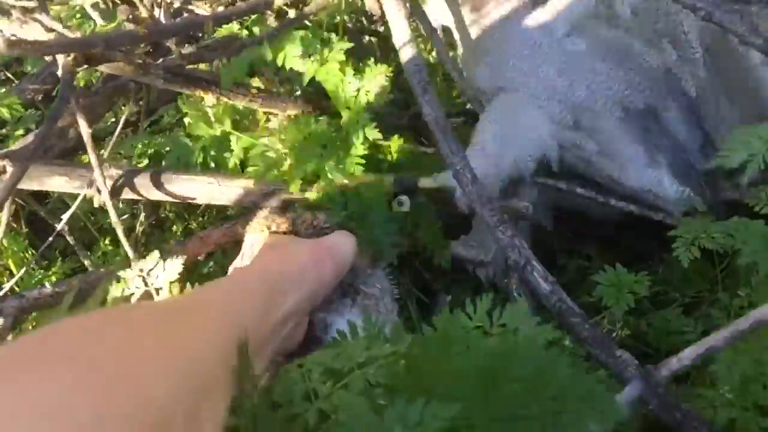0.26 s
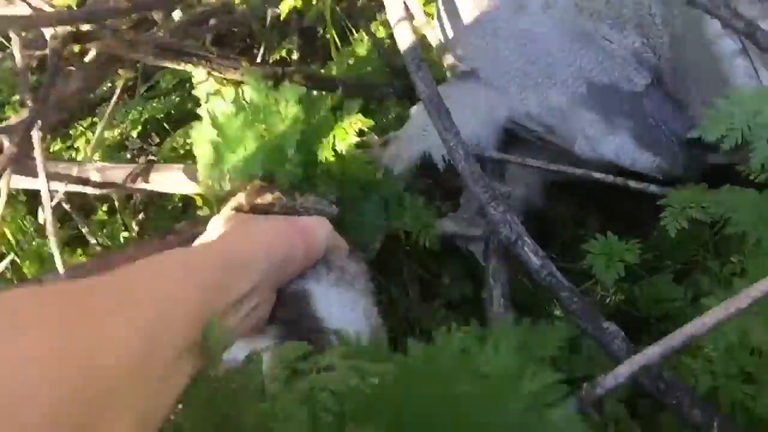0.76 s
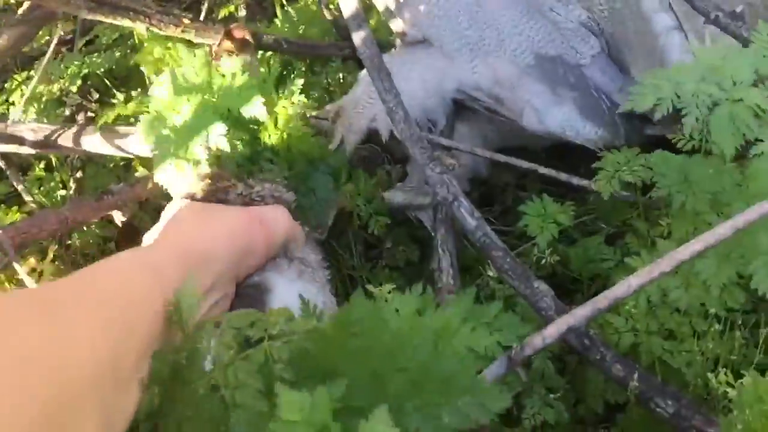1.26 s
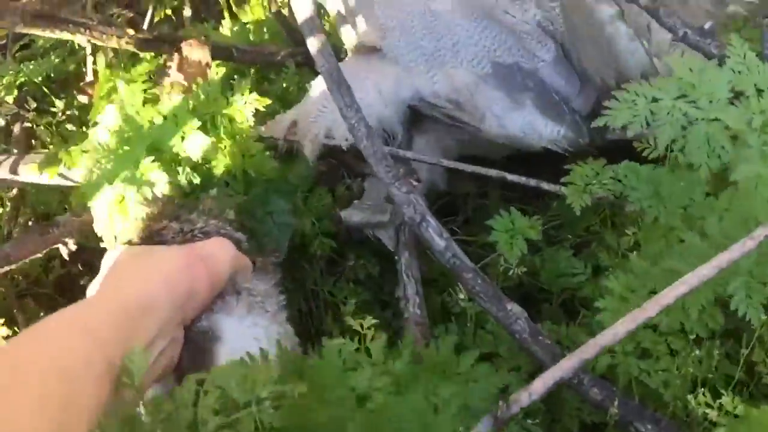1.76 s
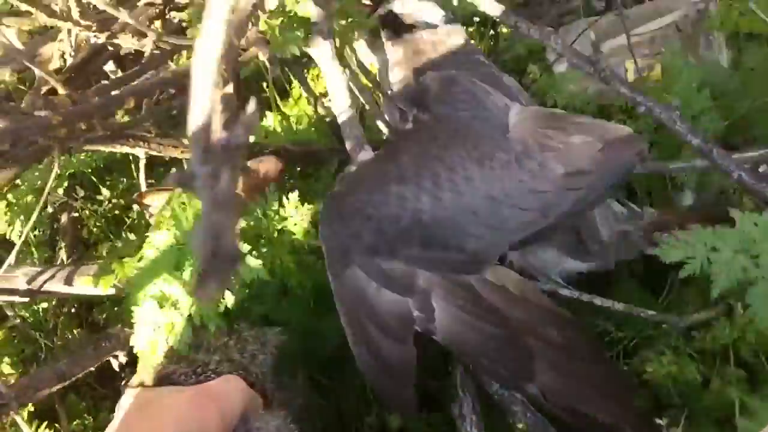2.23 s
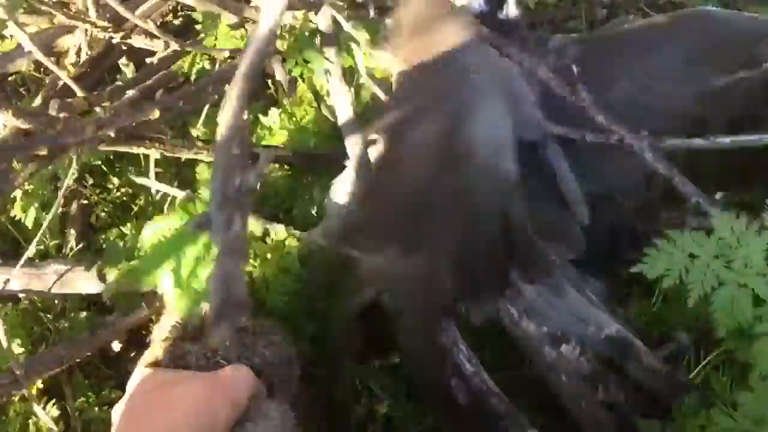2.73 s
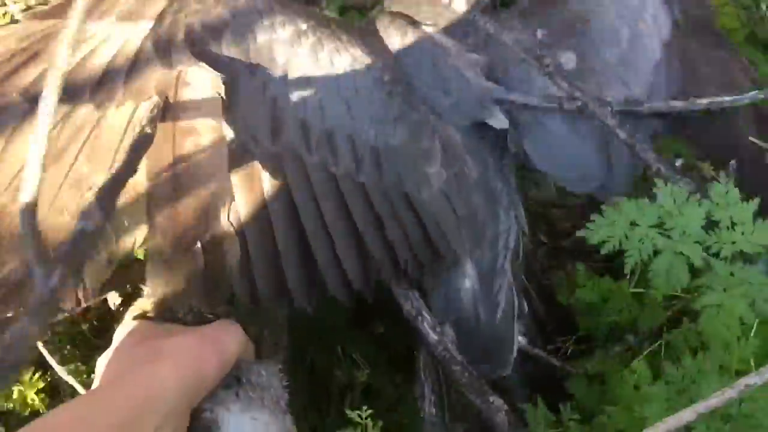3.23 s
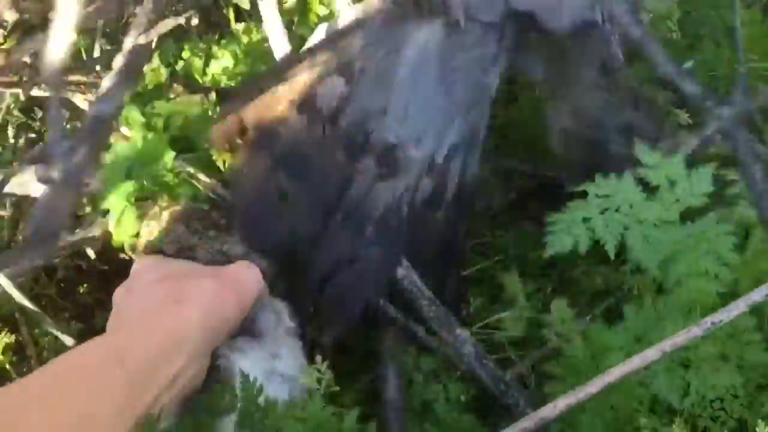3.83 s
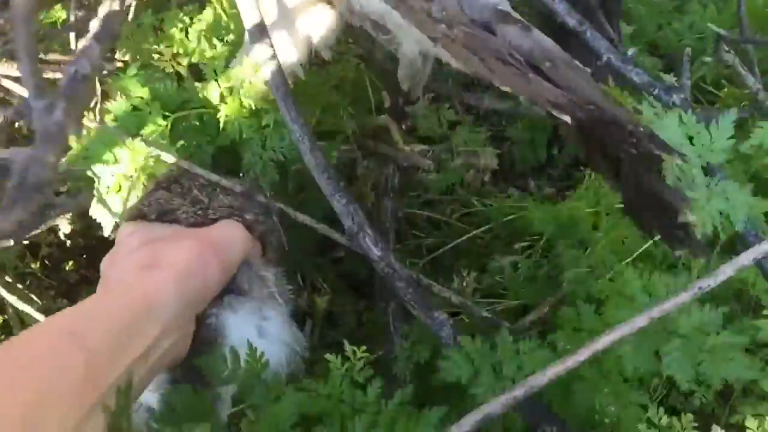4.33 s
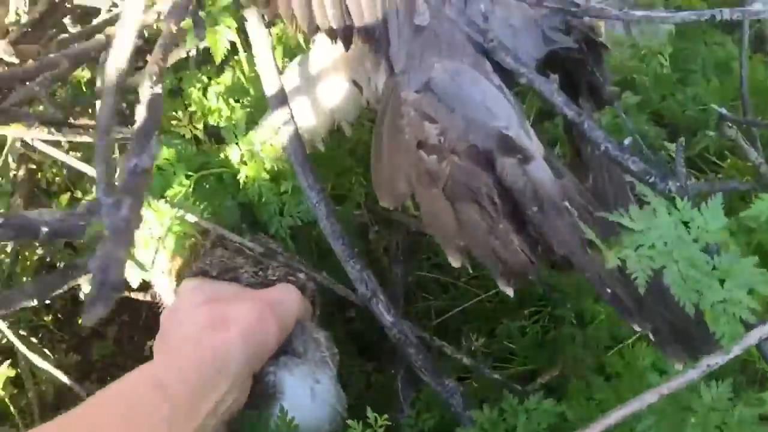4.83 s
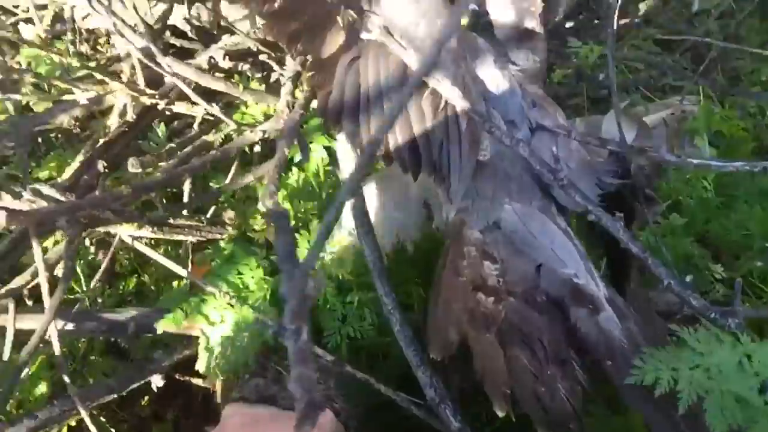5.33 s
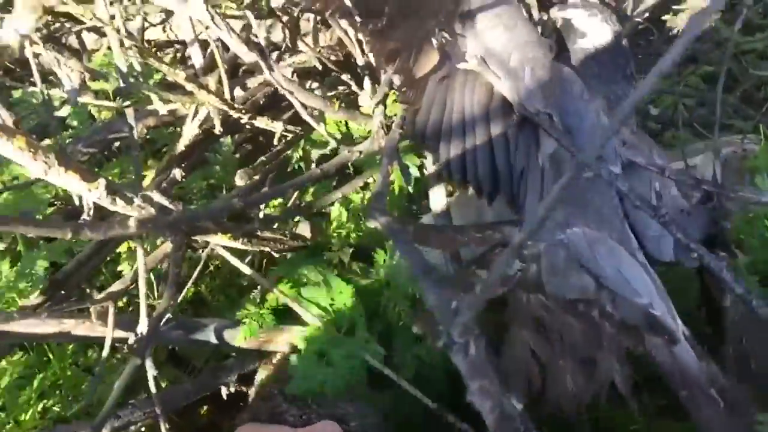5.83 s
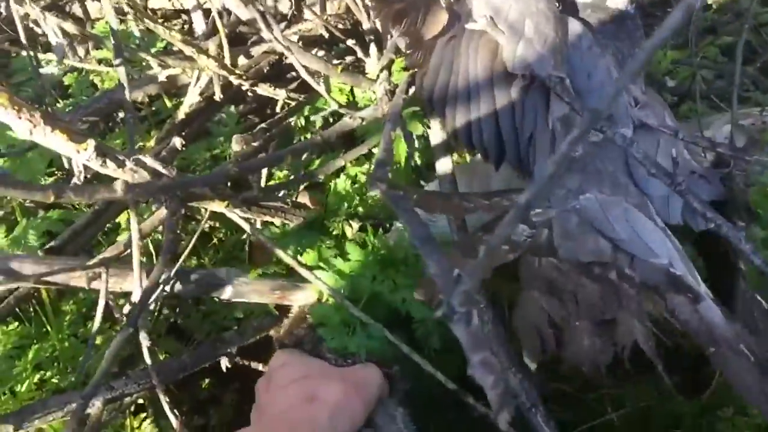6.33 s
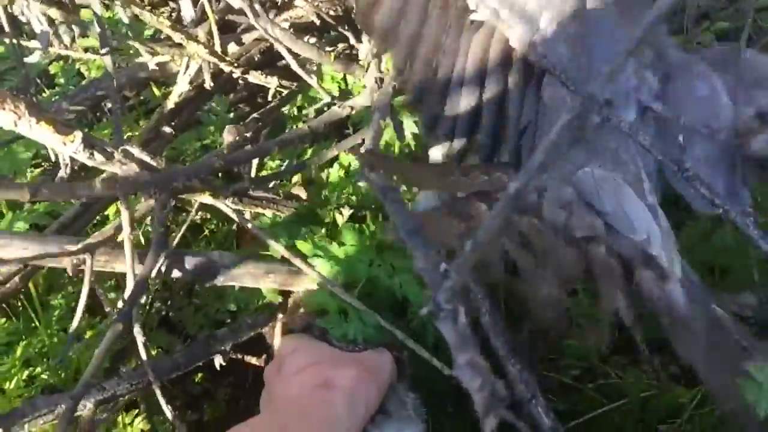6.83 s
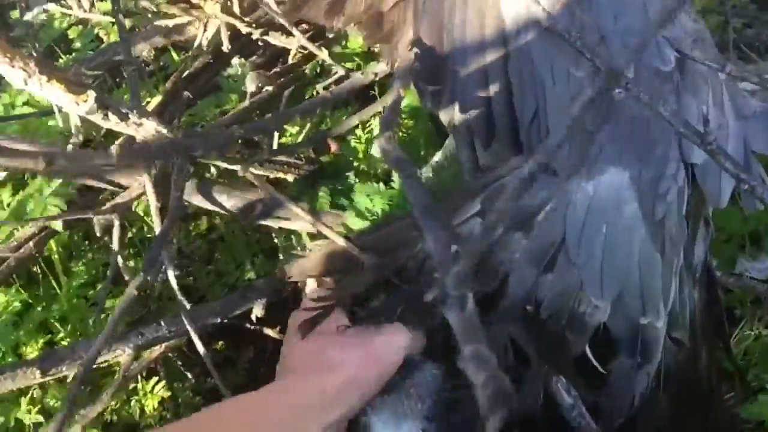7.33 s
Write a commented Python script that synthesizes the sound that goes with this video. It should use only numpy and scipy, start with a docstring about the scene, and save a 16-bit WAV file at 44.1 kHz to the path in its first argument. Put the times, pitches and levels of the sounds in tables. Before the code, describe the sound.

Thin gliding whistles and a small twig crack open an outdoor scene, and at once an animal begins screaming, high and harsh, about every two thirds of a second. Wings swish and crackle through leaves, strongest between two and four seconds, with sharp snapping twigs. Later the screams dominate over light rustling, until one more hard wing brush near seven seconds. The handheld microphone is close and catches dull bumps; the space is nearly dry.

```python
"""Outdoors in dry brush: an uneven rumble and a faint hush, filtered noise, lie under stirring leaves.
Thin gliding whistles and snapping twigs, short noise cracks, come in at once. Then a small animal, held down,
screams twelve times: pulsing folds rise as a clear tone, break into a rasp, then lock into a hoarse, fluttering tone.
Soft bumps, sinking sines, reach the microphone, while a large bird beats its wings among the branches:
swelling sweeps of noise and crackle. Ground and thicket add close scatter and a faint tail."""
import sys
import numpy as np
from scipy import signal
from scipy.fft import rfft, irfft
from scipy.io import wavfile
from scipy.ndimage import uniform_filter1d

SR = 44100
rng = np.random.default_rng(int(sys.argv[2]) if len(sys.argv) > 2 else 0)


def to_wav(sig):
    """Store sig (one row per channel, or 1-D mono) as 16-bit WAV at the path in sys.argv[1].

    Samples outside -1..1 are clipped; the rate is SR.
    """
    pcm = np.clip(np.atleast_2d(sig), -1, 1) * 32767
    pcm = np.round(pcm).astype(np.int16)
    wavfile.write(sys.argv[1], SR, pcm.T)  # frames by channels


N = 333837
TIME = np.arange(N) / SR


def amp(db):
    """Amplitude of a level in dB."""
    return 10 ** (np.asarray(db) / 20)


def unit(x):
    """Scale to an RMS of 1."""
    return x / np.sqrt(np.mean(x ** 2) + 1e-20)


def add(mix, s, sound):
    """Lay a sound into the mix from time s, cut at the end."""
    part = mix[max(round(s * SR), 0):][:len(sound)]
    part += sound[:len(part)]


def drift(t, hz):
    """Random curve of RMS 1, in straight lines between hz new values a second."""
    return unit(np.interp(t * hz, np.arange(8192), rng.standard_normal(8192)))


def colour(x, points, size=2048):
    """Causal (minimum-phase) filter with the given (frequency [Hz], gain [dB]) outline."""
    hz, db = np.transpose(points)
    bins_hz = np.fft.rfftfreq(size, 1 / SR)
    log_gain = np.log(amp(np.interp(np.log(bins_hz + 1), np.log(hz), db)))
    # folding the cepstrum onto positive times makes the filter causal
    cepstrum = irfft(log_gain)
    cepstrum[1:size // 2] *= 2
    cepstrum[size // 2 + 1:] = 0
    response = irfft(np.exp(rfft(cepstrum)))
    return signal.oaconvolve(x, response)[:len(x)]


def pulses(places, sizes, length):
    """Band-limited clicks at exact places between samples."""
    at = np.floor(places).astype(int)[:, None] + np.arange(-7, 9)
    offset = at - places[:, None]
    shape = np.sinc(offset) * np.cos(np.pi * offset / 16) ** 2
    return np.bincount(np.clip(at, 0, length - 1).ravel(), (shape * sizes[:, None]).ravel(), length)


def step(t, s, width):
    """Soft switch from 0 to 1, halfway at time s."""
    return .5 + .5 * np.tanh((t - s) / width)


# spectral outline of the outdoor hush: (frequency [Hz], relative level [dB])
HUSH_OUTLINE = [(25, -21.5), (80, -6.5), (250, -22), (400, -21), (600, -14.5), (1000, -25), (1800, -18),
                (2400, -27), (3200, -24), (4800, -50), (8000, -56), (15000, -63.5)]
# spectral outline of the rumble: (frequency [Hz], relative level [dB])
RUMBLE_OUTLINE = [(25, -38), (60, 3), (120, -3), (250, -18.5), (700, -24.5), (2000, -71.5)]


def air(hush_db=-52, rumble_db=-51):
    """Faint outdoor hush and an uneven rumble on the microphone, both filtered noise."""
    hush = unit(colour(rng.standard_normal(N), HUSH_OUTLINE, size=8192))
    hush *= amp(hush_db + drift(TIME, 20))
    rumble = unit(colour(rng.standard_normal(N), RUMBLE_OUTLINE, size=8192))
    settling_db = np.interp(TIME, [3.5, 4.5], [1.5, -4])  # the rumble is weaker in the second half
    return hush + rumble * amp(rumble_db + 3.8 * drift(TIME, 11) + settling_db)


def sweep(s, rise, fall, db, fade_db=-21.5):
    """Strength of one wing brush: it swells to its peak and dies away, losing fade_db over its rise or fall."""
    return amp(db + fade_db * np.maximum((s - TIME) / rise, (TIME - s) / fall))


# spectral outline of rustling leaves: (frequency [Hz], gain [dB])
LEAF_OUTLINE = [(60, -13.5), (200, -3), (450, -10), (900, -4.5), (1600, -4), (2400, -8.5), (3400, 3),
                (4500, -10), (7000, -20.5), (10000, -30.5), (15000, -35.5)]
# wings and leaves brushing the branches: (loudest time [s], rise [s], fall [s], strength at the peak [dB])
WING_SWEEPS = [(.58, 0.24, 0.58, -40.5), (2.15, 0.055, .35, -34), (2.45, 0.9, 0.49, -35),
               (2.81, 0.083, 0.13, -29.5), (2.924, 0.22, .06, -20), (3.02, 0.12, 0.17, -33),
               (3.37, 0.17, 0.96, -31), (3.615, 0.063, 0.032, -26), (3.881, 0.047, 0.052, -18),
               (4.05, 0.6, 0.48, -39.5), (5.3, 0.56, 0.42, -44), (6.933, .03, .045, -18.5),
               (7.13, 0.08, 0.28, -43)]
STIR_DB = -58.5  # the leaves never lie quite still


def rustle(grains_per_s=900, grain_db=4.0, swish=0.3, crisp_db=6):
    """Feathers swish over leaves, with clumps of tiny crackles; hard sweeps are crisper."""
    struck = rng.random(N) < grains_per_s / SR
    grain_sizes = amp(grain_db * np.minimum(rng.exponential(1, N), 4))
    grains = struck * rng.choice([-1, 1], N) * grain_sizes
    sound = unit(colour(grains + swish * rng.standard_normal(N), LEAF_OUTLINE))
    clumps_db = 2.5 * drift(TIME, 110)
    strength = np.sqrt(amp(STIR_DB) ** 2 + sum(sweep(*row) ** 2 for row in WING_SWEEPS))
    treble = signal.sosfiltfilt(signal.butter(2, 9000, "high", fs=SR, output="sos"), sound)
    crispness = amp(crisp_db) * np.sqrt(strength / strength.max())
    return (sound + treble * (crispness - 1)) * strength * amp(clumps_db)


# thin whistles: (start [s], loudest time [s], end [s], first pitch [Hz], middle pitch [Hz], last pitch [Hz],
#   RMS level at the loudest [dB]); a row that ends before it starts is silent
WHISTLE_GLIDES = [(0, 0.057, 0.096, 1607, 1710, 1870, -31), (.08, 0.143, 0.27, 1830, 1646, 1570, -27.5),
                  (.47, 0.617, 0.66, 756, 883, 810, -41.5), (.63, 0.784, 1.07, 784, 877, 834, -32),
                  (.93, 1.01, 1.06, 839, 819, 786, -31.5), (1.036, 1.063, 1.14, 710, 620, 555, -47),
                  (1.42, 1.433, 1.48, 2420, 3440, 3060, -20.5), (3.189, 3.35, 3.4, 816, 905, 907, -39),
                  (4.969, 4.981, 4.99, 1160, 1224, 1340, -24.5),
                  (4.986, 5.018, 5.03, 1650, 1760, 1770, -12), (5.025, 5.084, 5.27, 1810, 1780, 1567, -37),
                  (5.178, 5.21, 5.14, 4700, 5100, 4940, -42.5), (7.129, 7.14, 7.168, 1014, 912, 1030, -30)]
WHISTLE_FADE_DB = -11  # level at both ends, relative to the loudest point


def whistle(start, loudest, end, first_hz, middle_hz, last_hz, db):
    """A second, nearly pure oscillation beside the voice glides along one arc, swelling and fading."""
    t = np.arange(start, end, 1 / SR)
    arc = np.polyfit([0, .5, 1], [first_hz, middle_hz, last_hz], 2)
    hz = np.polyval(arc, (t - start) / (end - start))
    phase = 2 * np.pi * np.cumsum(hz * (1 + 0.019 * drift(t, 250))) / SR
    tone = unit(np.sin(phase) + amp(-15) * np.sin(2 * phase) + amp(-25) * np.sin(3 * phase))
    fade_db = WHISTLE_FADE_DB * np.interp(t, [start, loudest, end], [1, 0, 1])
    level = amp(db + fade_db + 2 * drift(t, 60))
    return start, tone * level * signal.windows.tukey(len(t), .1)


# twigs snapping: (time [s], level, 6 dB under the peak [dB], ring [Hz])
TWIG_SNAPS = [(0.015, -24.5, 3400), (0.517, -27, 3370), (0.576, -27.5, 2570), (0.605, -33, 3400),
              (0.621, -18.5, 3320), (1.952, -27, 1600), (2.037, -18.5, 1000), (2.112, -17.5, 1100),
              (2.159, -11.5, 3150), (2.221, -20, 1200), (2.459, -10.5, 1580), (2.803, -14, 3380),
              (2.918, -13.5, 2400), (3.819, -24, 3360), (3.845, -32, 3630), (3.874, -28, 3390),
              (3.894, -19, 3530), (7.104, -22.5, 3660), (7.133, -26, 3600)]


def snap(s, db, hz):
    """A dry twig cracks, rings for a moment and shakes its leaves: noise with a fast and a slow decay."""
    t = np.arange(0, .06, 1 / SR)
    crack = rng.standard_normal(len(t)) * (np.exp(-t / .0018) + .07 * np.exp(-t / .012))
    wood = colour(crack, [(120, -26), (750, -9), (hz, 0), (4000, -5), (5200, -20), (14000, -38)])
    return s, amp(db + 6) * wood / abs(wood).max()


# the voice cracks for a moment: (time [s], length [s], jump [share of the pitch])
VOICE_CRACKS = [(2.063, 0.03, -0.071), (4.641, 0.011, -.1), (5.283, 0.0164, 0.19), (5.337, 0.073, -0.17),
                (5.982, 0.013, -.1), (7.283, 0.015, -0.13)]
CLIMB = .11  # share by which the pitch climbs during the clear rise
CREST_S, SAG_HZ_PER_S = .1, 450  # from locking to the crest; then the pitch sags as the breath runs out
WANDER, WANDER_PER_S = .006, 35  # the pitch is never quite steady: share of the pitch, changes a second


def scream_pitch(t, start, breaks, locks, rise_hz, lock_hz, crest_hz):
    """The pitch climbs through the rise, leaps during the rasp, crests and sags; now and then it cracks."""
    turning_points = [start, breaks, locks, locks + CREST_S]
    pitches = [rise_hz * (1 - CLIMB / 2), rise_hz * (1 + CLIMB / 2), lock_hz, crest_hz]
    hz = np.interp(t, turning_points, pitches)
    hz -= SAG_HZ_PER_S * np.maximum(t - locks - CREST_S, 0)
    hz *= 1 + WANDER * drift(t, WANDER_PER_S)
    jumps = sum(share * (step(t, s, 0.0029) - step(t, s + length, 0.0047))
                for s, length, share in VOICE_CRACKS)
    return hz * (1 + jumps)


SOFT_START_DB, ATTACK_S = -12.5, 0.03  # each scream starts softly and gathers force


def scream_effort(t, start, end, opening_db, closing_db):
    """Level in dB: a quick attack over a straight line from opening to closing level."""
    line_db = np.interp(t, [start, end], [opening_db, closing_db])
    return line_db + SOFT_START_DB * np.exp(-(t - start) / ATTACK_S)


CATCHES_IN_RISE, CATCHES_HELD = 38, 78  # typical catches of the folds a second
CATCH_S = .0027  # half the length of one catch


def fold_catches(t, broken, locked, strain, strain_rate):
    """The folds catch again and again, at uneven intervals and with uneven force."""
    rate = CATCHES_IN_RISE * (1 - broken) + CATCHES_HELD * (broken - strain) + strain_rate * strain
    rate = rate * np.exp((.36 - .25 * locked) * drift(t, 50))
    from_catch_s = ((np.cumsum(rate) / SR + rng.random()) % 1 - .5) / rate
    catch = np.exp(-(from_catch_s / CATCH_S) ** 2)
    return catch * np.clip(1 + .35 * drift(t, 45), .1, 1.4)  # some are hard, some barely happen


def fold_pulses(t, turns, rough, weakening):
    """One pulse a fold cycle: roughness scatters time and size, weakening shrinks every other pulse."""
    samples = np.arange(len(t))
    cycle = np.arange(1, int(turns[-1]))
    at = np.interp(cycle, turns, samples).astype(int)
    late, strong, wander = rng.standard_normal((3, len(cycle)))
    chaos = np.minimum(rough * np.exp(.3 * drift(t, 60)), 1)[at]
    # a second mode of the folds beats against the first: wandering side tones
    beat = np.cos(2 * np.pi * np.cumsum(.3 + .08 * drift(t, 70)[at]))
    weak = (cycle % 2) * weakening[at]
    slips = chaos * (.04 * late + .14 * beat) + np.cumsum(.027 * chaos * wander)
    force = chaos * (.3 * strong + .55 * beat + .3 * drift(t, 450)[at])
    sizes = (1 - weak) * (1 + .85 * np.tanh(force))
    return pulses(np.interp(cycle + slips, turns, samples), sizes, len(t))


# throat with the mouth half open: (frequency [Hz], gain [dB])
THROAT_HALF_OPEN = [(400, -62.5), (750, -19.5), (1050, -6.5), (1500, -9), (2050, 6.5), (2700, -16.5),
                    (3300, -7), (4300, -16.5), (5400, -13), (6500, -34), (9300, -28), (10700, -51.5),
                    (15000, -49)]
# throat with the mouth wide open: (frequency [Hz], gain [dB])
THROAT_WIDE_OPEN = [(400, -35.5), (750, -22), (1150, -10.5), (1550, -27.5), (2300, -2), (3050, 1),
                    (3750, -0.5), (4400, -16), (4900, -22.5), (5350, -11.5), (6500, -25.5), (9300, -35),
                    (10700, -42), (15000, -63)]
# side resonances of the throat that swell and fade: (frequency [Hz], sharpness Q [-])
SIDE_RESONANCES = [(2250, 7.4), (3750, 2)]
SHIFT_DB, SHIFT_PER_S = 1.8, 30  # their RMS change, changes a second


def throat(t, folds, mouth, rasp, strain, waver_db, pinch_db):
    """Resonances shape the fold pulses as the mouth opens; the result is evened to a steady level."""
    voice = (1 - mouth) * colour(folds, THROAT_HALF_OPEN) + mouth * colour(folds, THROAT_WIDE_OPEN)
    # the rasp rings the main throat resonance, which gives it a coarse grain
    ring = signal.lfilter(*signal.iirpeak(2750, 4.5, fs=SR), voice)
    voice = voice + 1.5 * rasp * ring
    for side_hz, q in SIDE_RESONANCES:
        side = signal.lfilter(*signal.iirpeak(side_hz, q, fs=SR), voice)
        voice = voice + side * (amp(SHIFT_DB * drift(t, SHIFT_PER_S)) - 1)
    # the upper resonances waver, and are pinched under strain
    upper = signal.sosfiltfilt(signal.butter(4, 4500, "high", fs=SR, output="sos"), voice)
    voice = voice + upper * (amp(waver_db * drift(t, 25) + pinch_db * strain + 0.4) - 1)
    return voice / np.sqrt(abs(uniform_filter1d(voice ** 2, size=800)) + 1e-12)


# one row a scream: (start [s], breaks into a rasp [s], locks again [s], strain sets in [s], end [s],
#   opening level before the soft start [dB], closing level [dB], mid-rise pitch [Hz], pitch on locking [Hz],
#   crest pitch [Hz], roughness of the rise [0-1], roughness after locking [0-1], period doubling [0-1],
#   typical catches under strain [1/s])
SCREAM_ROWS = [(.075, .18, .365, .52, .484, -21.5, -21.5, 1095, 1190, 1185, .16, .17, .05, 60),
               (.638, .8, .93, .95, 1.138, -24, -19, 1110, 1440, 1490, .17, .5, .5, 70),
               (1.285, 1.49, 1.585, 1.705, 1.872, -22.5, -14.3, 1050, 1515, 1555, .11, .05, .8, 45),
               (2.02, 2.225, 2.31, 2.44, 2.558, -22, -12.8, 1030, 1530, 1582, .06, .05, .8, 80),
               (2.7, 2.82, 2.94, 2.97, 3.186, -20.5, -17.5, 1060, 1630, 1565, .12, .13, .8, 70),
               (3.326, 3.49, 3.605, 3.64, 3.81, -23.5, -14, 1045, 1470, 1545, .11, .07, .8, 48),
               (3.97, 4.12, 4.245, 4.28, 4.453, -22.5, -15.7, 1155, 1485, 1547, .1, .07, .8, 40),
               (4.596, 4.762, 4.86, 4.99, 5.108, -22.3, -13, 1020, 1410, 1465, .12, .06, .8, 80),
               (5.266, 5.44, 5.545, 5.62, 5.788, -24, -11.5, 1060, 1400, 1540, .1, .14, .8, 58),
               (5.924, 6.06, 6.19, 6.3, 6.447, -21, -13.7, 1075, 1570, 1535, .11, .07, .8, 80),
               (6.588, 6.78, 6.88, 6.98, 7.088, -21.3, -14.7, 1075, 1510, 1680, .06, .24, .7, 85),
               (7.228, 7.38, 7.52, 7.6, 7.6, -22.3, -16, 1065, 1380, 1520, .11, .2, .7, 80)]
DIP_LEAST, DIP_PER_ROUGH = .035, .5  # a rougher rise dips further in pitch


def scream(start, breaks, locks, strains, end, opening_db, closing_db, rise_hz, lock_hz, crest_hz,
           rough_rise, rough_held, doubling, strain_rate, leak_db=-45, waver_db=2.5, pinch_db=-6):
    """Vocal folds pulse evenly, then chaotically, then strong-weak, through a throat that opens."""
    t = np.arange(start, end, 1 / SR)
    broken, locked, strain = step(t, breaks, .005), step(t, locks, .005), step(t, strains, .01)
    rasp = broken - locked
    rise = 1 - broken
    catch = fold_catches(t, broken, locked, strain, strain_rate)

    # each catch dips the pitch
    dips = DIP_LEAST + DIP_PER_ROUGH * rough_rise
    depth = 1.05 * dips * rise + .032 * broken + 1.4 / strain_rate * strain
    depth = depth * np.exp(.22 * drift(t, 40))
    wobble = .003 + .12 * rough_rise * rise + .045 * rasp + .02 * rough_held * locked
    hz = scream_pitch(t, start, breaks, locks, rise_hz, lock_hz, crest_hz)
    hz *= 1 - depth * (catch - .25) + wobble * drift(t, 170)
    # slack folds at both ends
    hz *= 1 - 0.27 * np.exp(-(t - start) / .014) - 0.42 * doubling * np.exp((t - end) / 0.00704)
    turns = np.cumsum(hz) / SR

    rough = rough_rise * rise * (.9 + 2.2 * catch) + (.3 + .65 * doubling) * rasp
    rough += .8 * rough_held * locked + strain * (.02 + .12 * catch)
    weakening = doubling * (.25 * broken + .75 * locked)
    folds = fold_pulses(t, turns, rough, weakening)
    folds += amp(leak_db) * rng.standard_normal(len(t)) * np.cos(np.pi * turns) ** 2  # air leaks each cycle
    mouth = step(t, breaks, 0.21) * np.clip(0.29 + doubling, 0, 1)
    voice = throat(t, folds, mouth, rasp, strain, waver_db, pinch_db)

    flutter_db = (.6 + 2.6 * strain) * (catch - .3) + .8 * drift(t, 110)
    swell = (1 - np.exp(-(t - start) / .008)) ** 2 * np.tanh((end - t) / .009) ** 2
    # the rasp loses power; the locked tone rings out until the strain chokes it
    register_db = -1.2 * rasp + 0.14 * locked * (1 - strain) + 0.14
    effort_db = scream_effort(t, start, end, opening_db, closing_db)
    return start, voice * swell * amp(effort_db + flutter_db + register_db)


# soft bumps: (time [s], peak level [dB], base pitch, which sinks from 1.455 to 0.795 of it [Hz])
SOFT_BUMPS = [(0.248, -27.5, 57), (0.43, -29, 93), (1.79, -18, 95), (2.305, -28.5, 89.5), (2.918, -27, 171),
              (3.398, -25.5, 59.5), (3.618, -32, 220.6), (4.734, -33.5, 101), (5.919, -30.5, 95),
              (7.405, -31, 78.1)]


def bump(s, db, hz):
    """A dull push, a short decaying sine that sinks in pitch."""
    t = np.arange(0, .1, 1 / SR)
    sinking_hz = hz * (0.795 + 0.66 * np.exp(-t / 0.008))
    push = np.sin(2 * np.pi * np.cumsum(sinking_hz) / SR) * t * np.exp(-t / 0.0037)
    return s, amp(db) * push / abs(push).max()


def brush(x, echo_db=-27, t60=0.28, near_db=-13):
    """Ground and branches scatter the sound at once; the thicket leaves a faint tail."""
    t = np.arange(0, .6, 1 / SR)
    scattered = (rng.random((2, len(t))) < 2500 / SR) * (t > .002)  # sparse echoes, 2500 a second
    near, far = rng.choice([-1, 1], (2, len(t))) * scattered
    near = near * np.exp(-t / 0.0073)
    far = far * amp(-60 * t / t60)
    response = amp(near_db) * near / np.linalg.norm(near) + amp(echo_db) * far / np.linalg.norm(far)
    return x + signal.oaconvolve(x, response)[:N]


def scene():
    """Whistles, twigs, screams, bumps and wings in the brush, over the outdoor air."""
    mix = np.zeros(N)
    sources = (whistle, WHISTLE_GLIDES), (snap, TWIG_SNAPS), (scream, SCREAM_ROWS), (bump, SOFT_BUMPS)
    for source, table in sources:
        for row in table:
            add(mix, *source(*row))
    return (brush(mix + rustle()) + air())[None]


def record(dry, edge_hz=15400):
    """The recorder's band limit: a linear-phase low-pass."""
    low_pass = signal.firwin(511, edge_hz, window=("kaiser", 9), fs=SR)
    return signal.oaconvolve(dry, low_pass[None], "same")


dry = scene()
out = record(dry)
to_wav(out)
```